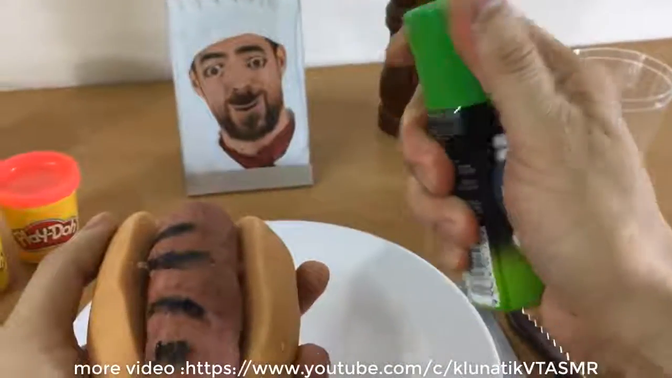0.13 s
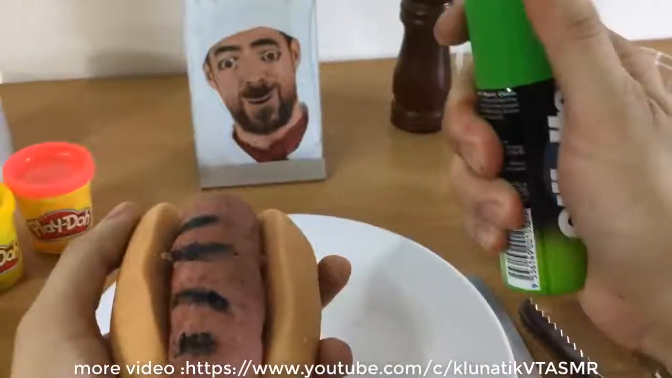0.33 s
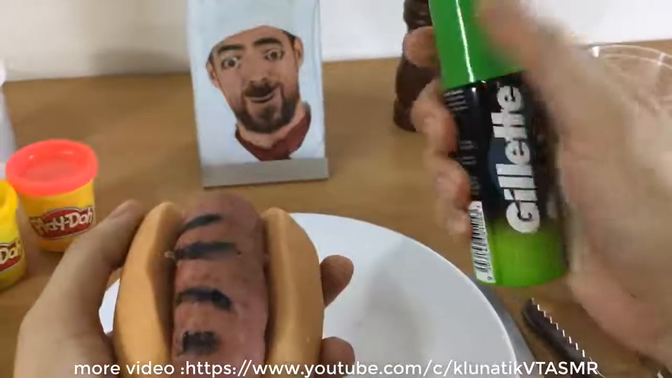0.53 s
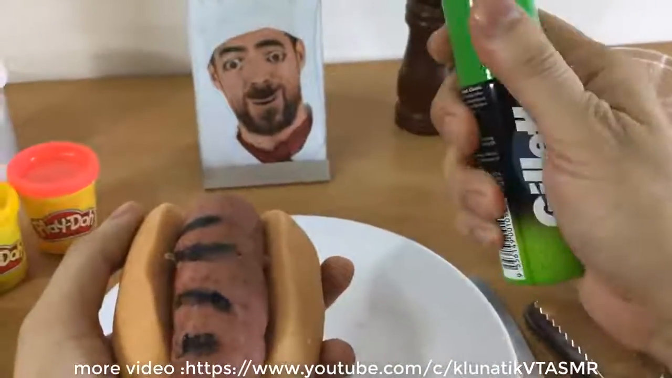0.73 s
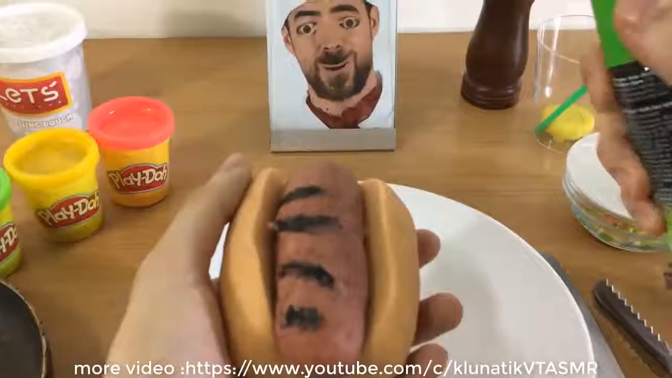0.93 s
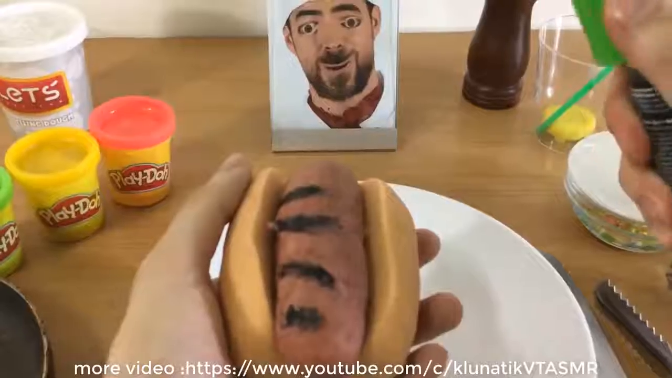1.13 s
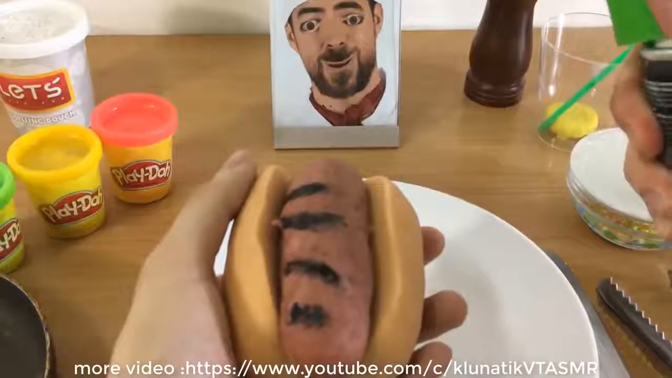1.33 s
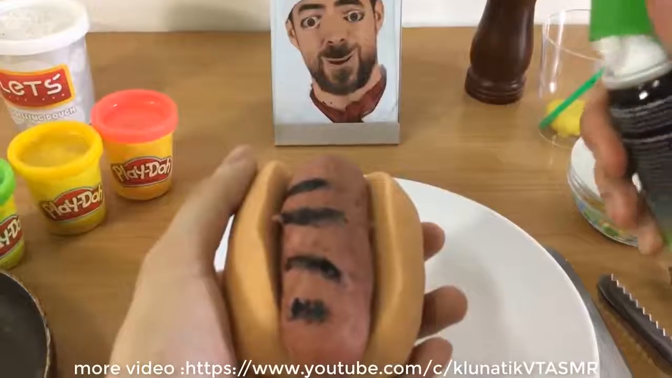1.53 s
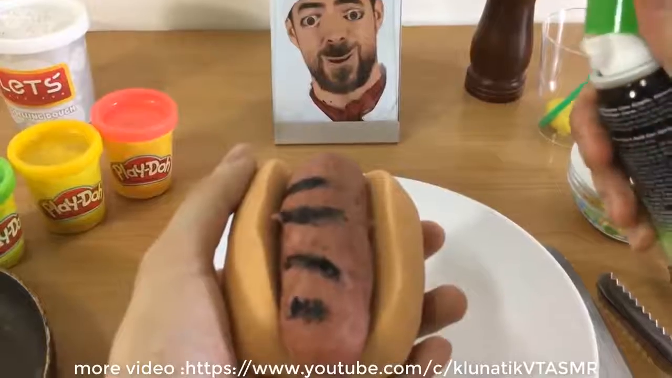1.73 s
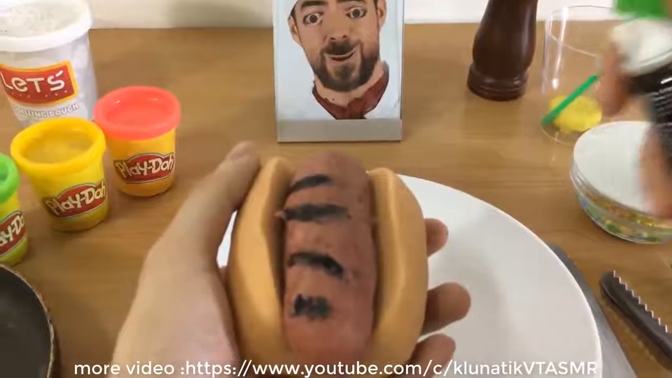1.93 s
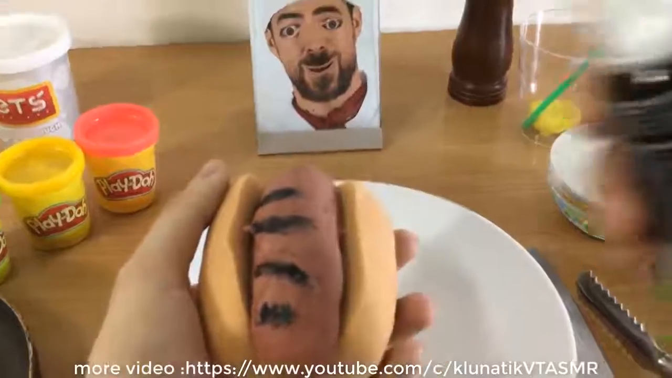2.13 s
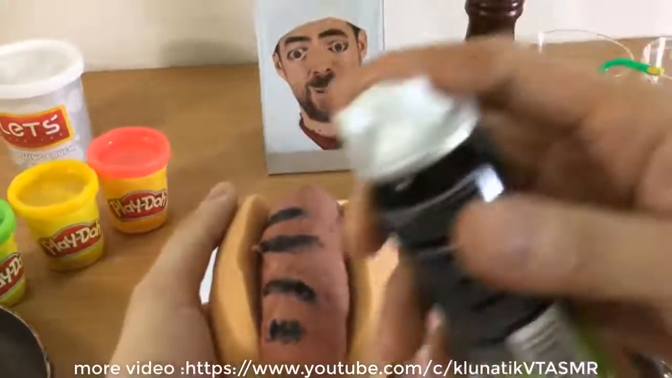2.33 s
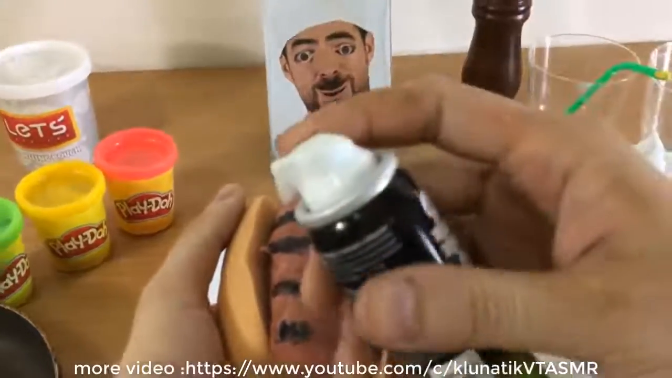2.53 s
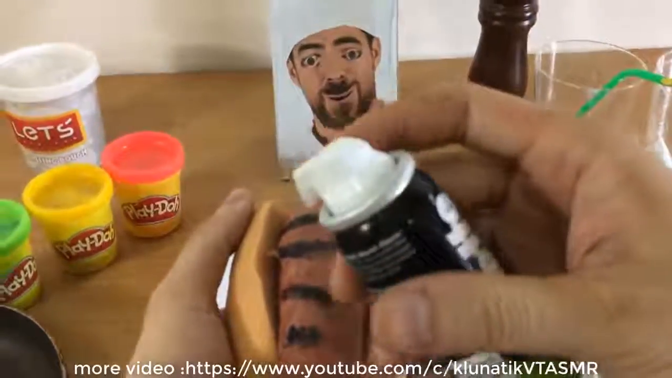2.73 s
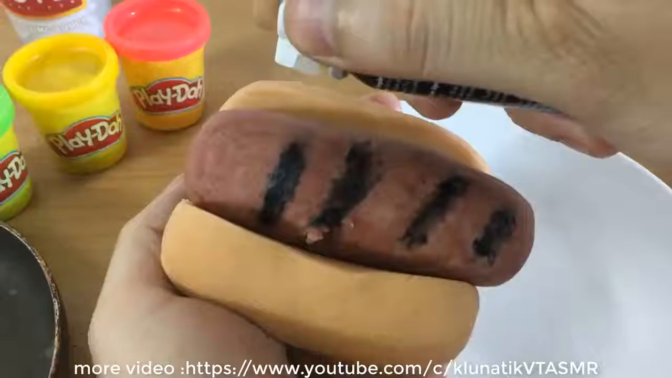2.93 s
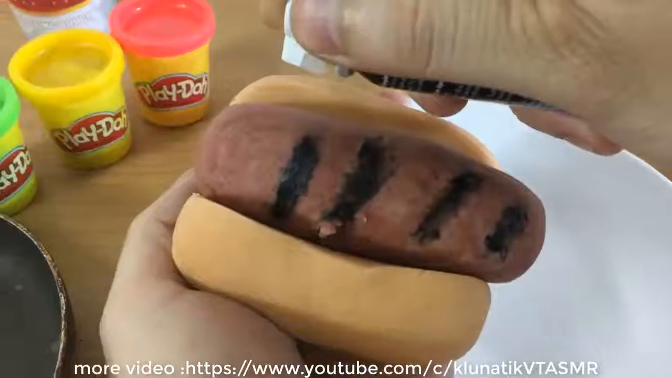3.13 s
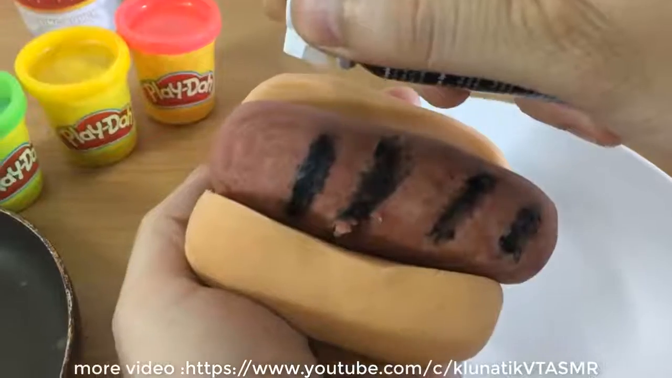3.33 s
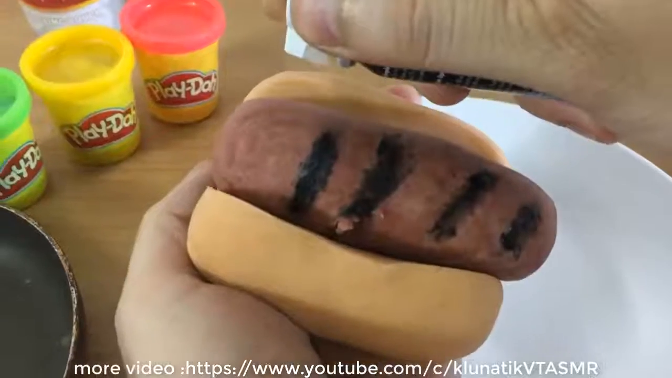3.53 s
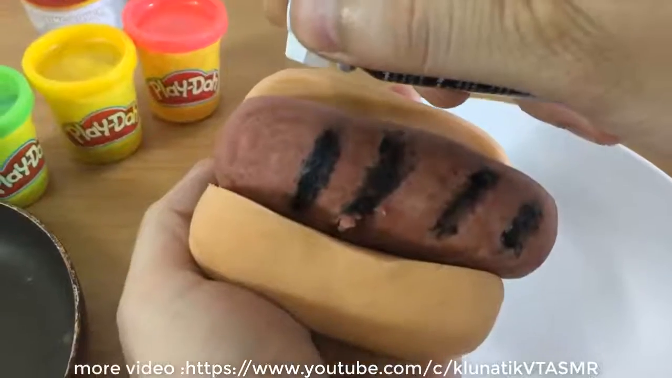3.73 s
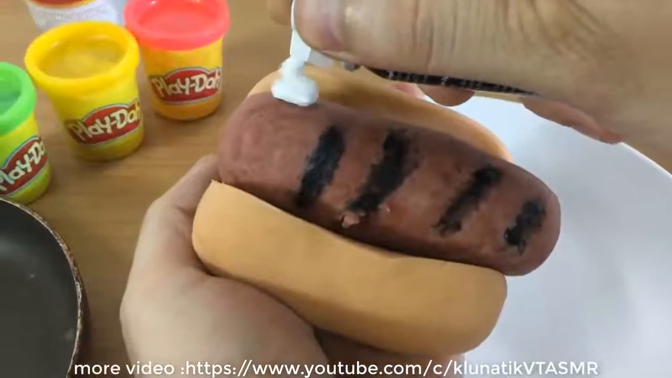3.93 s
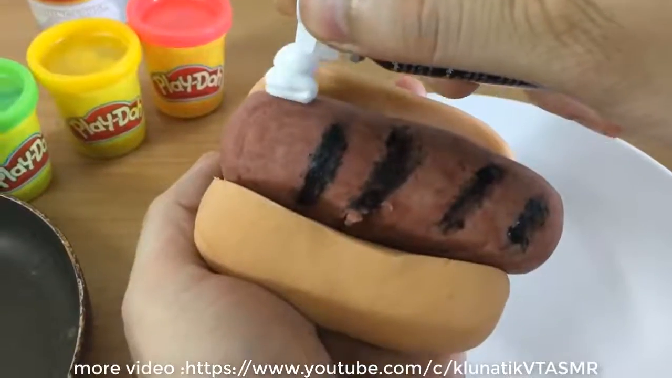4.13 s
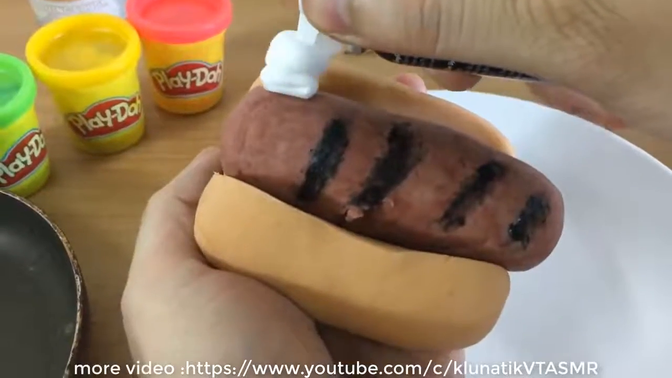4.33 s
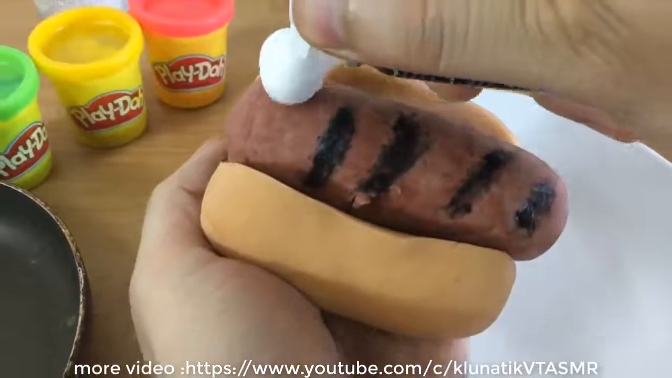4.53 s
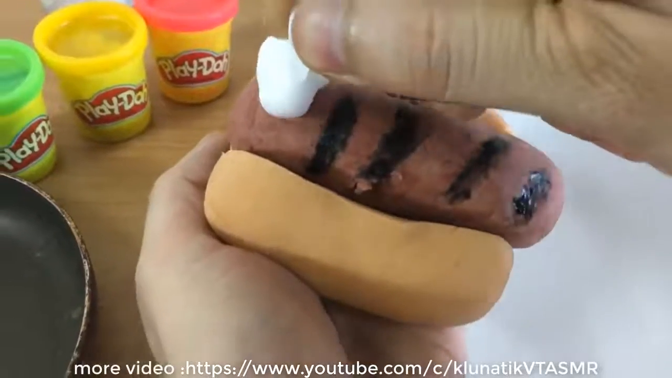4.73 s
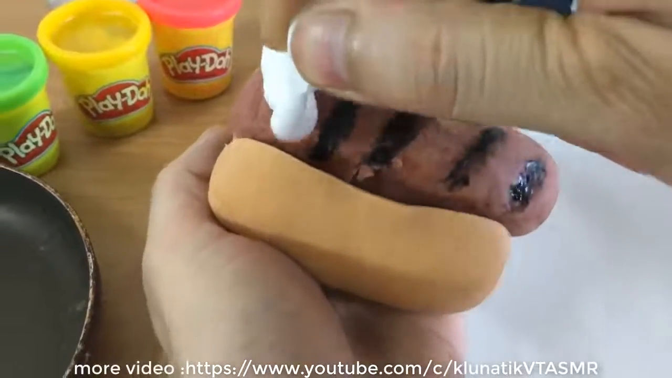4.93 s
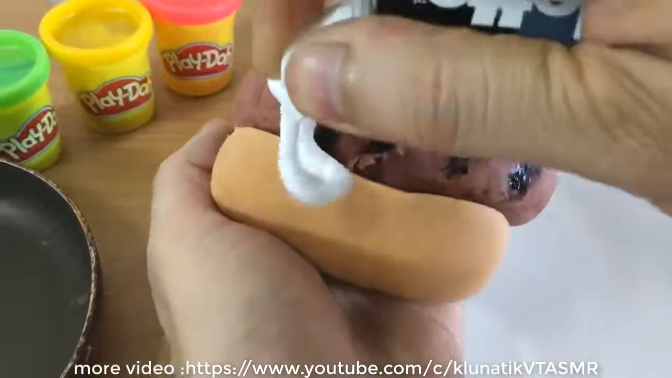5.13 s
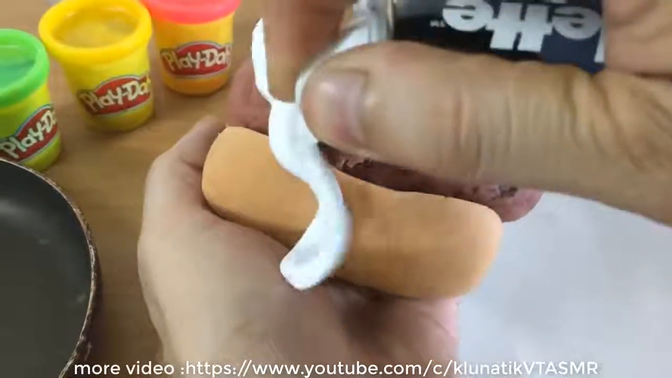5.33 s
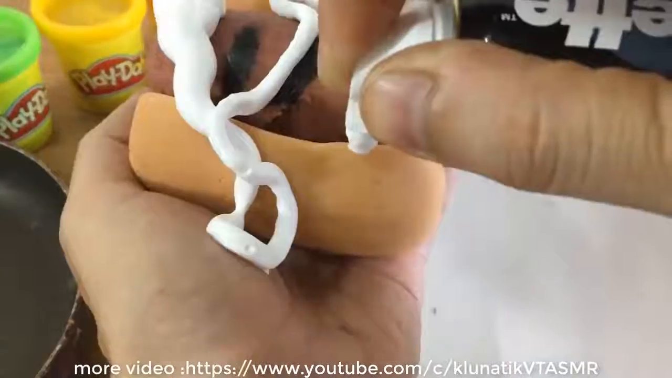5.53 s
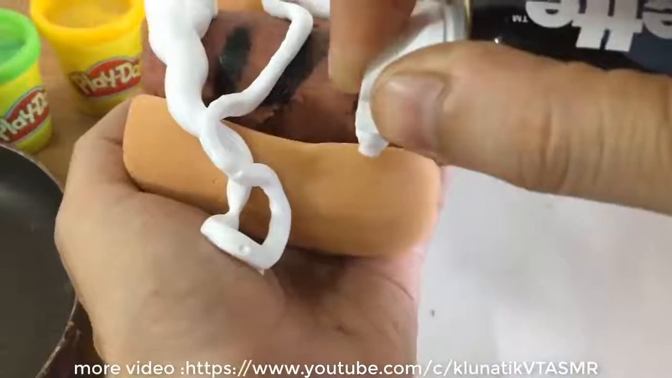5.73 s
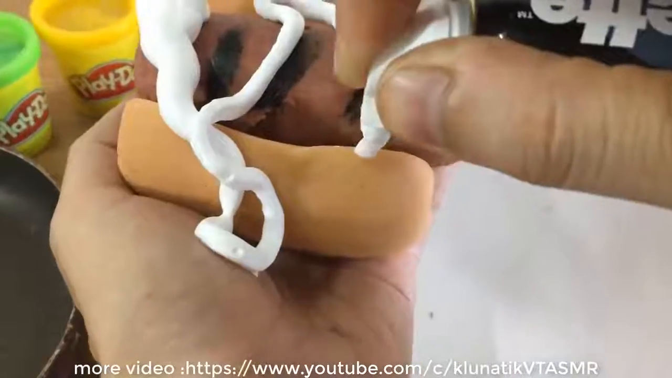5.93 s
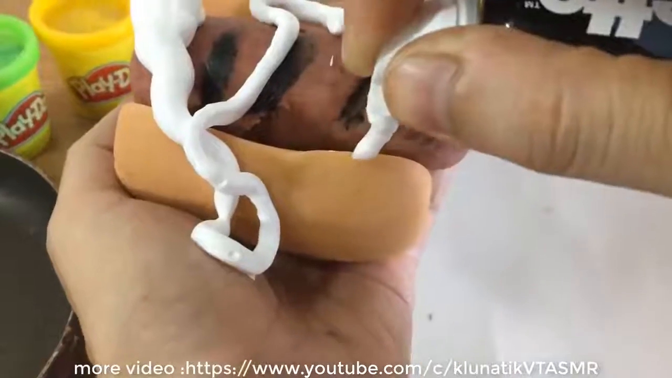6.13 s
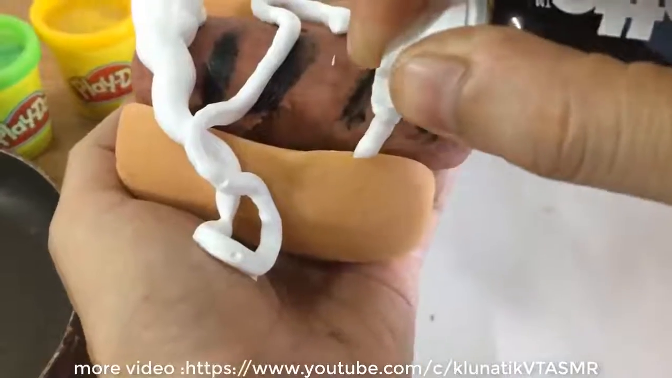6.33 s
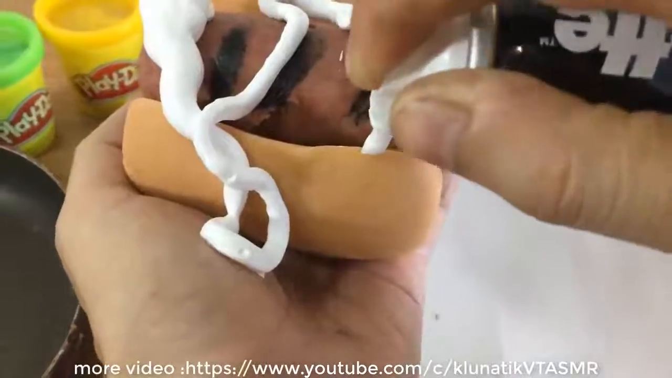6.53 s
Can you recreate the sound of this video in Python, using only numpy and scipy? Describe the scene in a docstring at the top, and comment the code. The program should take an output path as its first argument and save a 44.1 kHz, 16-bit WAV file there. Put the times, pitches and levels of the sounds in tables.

```python
"""A small room, where a can of shaving foam stands on a table close to a microphone.
Fingers rub and tap the can and snap off its cap: noise bursts, filtered clicks and decaying modes.
The valve opens with a swelling gas hiss over a faint fizz, both shaped noise. Then the foam takes over:
short noise spits, a brighter surge, and a wet sputter of ticks and ringing bubbles.
The room answers every close sound with a noise tail, over a low drone and passing rumbles."""
import sys
import numpy as np
from scipy import signal
from scipy.fft import rfft, irfft, next_fast_len
from scipy.io import wavfile
from scipy.ndimage import map_coordinates

SR = 44100
rng = np.random.default_rng(int(sys.argv[2]) if len(sys.argv) > 2 else 0)


def wrap_up_sound(samples):
    """Save the sound to the file named by the first command line argument, as 16-bit audio."""
    columns = np.atleast_2d(samples).T
    # keep every value between -1 and 1, then stretch to whole-number steps
    tamed = np.clip(columns, -1, 1)
    steps = np.round(tamed * 32767).astype(np.int16)
    wavfile.write(sys.argv[1], SR, steps)


N = 290178  # samples
# Spray timeline (s): valve starts to open, is fully open, foam plugs it, flow surges, jet breaks.
OPEN_S, FULL_S, FOAM_S, SURGE_S, BREAK_S = 3.595, 3.955, 4.025, 5.132, 5.615

# Levels in tables are relative: filters, layer trims and panning follow.
# In swells, rise_s and fall_s are the times for each 20 dB of change.

# Resonances of the spout and the hollow of the hand: centre_hz, width_hz, level_db
SPOUT_PEAKS = [(1900, 320, 0), (2400, 310, 2.5), (2970, 140, 3.5), (3690, 51, 7.5), (4980, 680, 5.5),
               (6170, 340, 3.5), (6960, 240, 2.5), (8660, 560, 4.5), (9730, 430, 4)]


def spray():
    """All sounds of the jet pass the same resonances of spout and hand."""
    jet = hiss() + spurts() + gurgle() + spits() + wheeze() + pops() + sputter()
    return coloured(jet, [(1000, 0)], SPOUT_PEAKS)


# Spectrum of escaping gas: freq_hz, level_db (per Hz)
GAS_TONE = [(400, -14), (1050, -9), (1600, -4.5), (2500, -4.5), (3000, 1), (4200, -3), (5800, -8.5),
            (7500, -4), (11000, -7), (13500, -25), (16000, -27)]
# Spectrum of tearing foam: freq_hz, level_db (per Hz)
FOAM_TONE = [(300, -15), (650, -16), (950, 2), (1800, -7), (2600, -2), (4200, -5.5), (5200, -5), (7200, -3),
             (9900, -1), (13500, 4.5), (16000, -17.5)]
# Narrow resonances of the foam-filled nozzle, heard in fizz and spits: centre_hz, width_hz, level_db
NOZZLE_PEAKS = [(2450, 280, 2.5), (5200, 220, 5), (5930, 270, 4.5), (7130, 300, 4), (9800, 340, 4.5),
                (11360, 410, 3)]
# Broad sheen of the faster surge: centre_hz, width_hz, level_db
SHEEN_PEAKS = [(8000, 2400, 7.5)]


def hiss():
    """Turbulent gas is uneven noise; foam tearing at the nozzle is a finer fizz, brighter in the surge."""
    gas_noise = pair([(1000, 0.95), (8000, 0.13)], size=N)
    gas_noise = gas_noise * amp(1.6 * wobble(350) + 0.91 * wobble(45))
    gas = unit(coloured(gas_noise, GAS_TONE, [(4150, 400, 4.4)]))
    tearing = pair([(1000, 0.91), (6000, 0.027)], size=N)
    tearing = tearing * amp(1.2 * wobble(900) + 1.2 * wobble(40))
    fizz = unit(coloured(tearing, FOAM_TONE, NOZZLE_PEAKS))
    bright_fizz = unit(coloured(tearing, FOAM_TONE, NOZZLE_PEAKS + SHEEN_PEAKS))
    foam = foam_flow() * fizz + surge() * bright_fizz
    return gas_flow() * gas * pan(-4.5) + foam * pan(-1.4)


def gas_flow(level_db=-48.5, power=1.8, choke_db_per_s=334):
    """Gas grows as a power of the valve's opening, until foam plugs the nozzle."""
    opening = ramp(OPEN_S, FULL_S - OPEN_S)
    return opening ** power * amp(level_db - choke_db_per_s * since(FOAM_S))


def foam_flow(level_db=-57, rise_s=0.16, broken_loss_db=3):
    """A faint fizz starts with the valve, runs steadily and thins a little when the jet breaks."""
    return ramp(OPEN_S, rise_s) * amp(level_db - broken_loss_db * ramp(BREAK_S, 0.16))


def surge(level_db=-43, rise_s=0.59, collapse_db_per_s=1200):
    """The flow swells smoothly and collapses when the jet breaks."""
    rise = np.sin(np.pi / 2 * ramp(SURGE_S, rise_s)) ** 2
    return rise * amp(level_db - collapse_db_per_s * since(BREAK_S))


# Sputter and pops, spectrum of bursting pockets: freq_hz, level_db (per Hz)
BURST_TONE = [(150, -9.5), (550, -8.5), (850, 3), (1600, 1), (2400, 1), (3200, 3), (4200, -0.5), (5300, -2),
              (6100, -6), (7000, -4), (7800, -13.5), (11000, -27), (16000, -54)]


def sputter(per_second=340, spread_db=4.6, clump_db=3.3, rush=0.2, wet=0.9):
    """Countless gas pockets crackle in clumps over a rush of air, each ringing at its own pitch."""
    t = np.arange(SR // 150) / SR
    at = np.flatnonzero(rng.random(N) < per_second / SR * amp(clump_db * wobble(90)))
    sizes = amp(spread_db * np.minimum(rng.exponential(size=len(at)), 3))
    hz = np.clip(2100 * np.exp(0.526 * rng.standard_normal((len(at), 1))), 700, 6500)
    # the ring decays by 1/e in 1.7 cycles
    rings = sizes[:, None] * np.sin(2 * np.pi * hz * t) * np.exp(-hz * t / 1.7)
    places = at[:, None] + np.arange(len(t))
    bubbles = np.bincount(places.ravel(), rings.ravel(), N)[:N]
    ticks = coloured(np.bincount(at, sizes, N), BURST_TONE)
    pockets = unit(ticks) + wet * unit(bubbles)
    reflections = burst(scatter=0.13, t60=0.023, side_db=2.5)
    crackle = signal.fftconvolve(pockets[None], reflections, axes=1)[:, :N]
    jet = unit(coloured(pair([(1000, 0.57), (5000, 0.18)], size=N), BURST_TONE))
    jet = jet * amp(1.6 * wobble(70))
    # sputters ever harder, holds, then eases off
    strength = ramp(BREAK_S, 0.13) * swell(6.266, db=-43, rise=1.4, hold=0.25, fall=0.14)
    return strength * unit(unit(crackle) + rush * jet) * pan(-7.0)


# Single gas pockets bursting from the spout, some loud, some faint: start_s, level_db, pitch_hz
POPS = [(4.0405, -32.5, 1090), (4.048, -39, 2090), (4.06, -46, 1110), (5.121, -35, 1010),
        (5.126, -32, 2450), (5.6247, -28.5, 1900), (5.6725, -34.5, 2800), (5.7072, -31.5, 1810),
        (5.7752, -20.5, 1400), (5.8577, -21, 2050), (5.9182, -26.5, 1090), (5.9932, -31, 2400),
        (6.014, -26, 4940), (6.0194, -25.5, 1820), (6.04, -29.5, 2970), (6.047, -32, 4520),
        (6.071, -26.5, 1850), (6.094, -26.5, 1560), (6.117, -32, 1850), (6.1583, -27.5, 4400),
        (6.1628, -25, 820), (6.171, -22, 4400), (6.1786, -26, 5000), (6.2207, -17.5, 1850),
        (6.2232, -24, 3130), (6.2315, -25, 2970), (6.2385, -24, 895), (6.244, -20.5, 2900),
        (6.2485, -21.5, 1900), (6.2494, -28, 900), (6.27, -27.5, 1810), (6.282, -32, 1400),
        (6.3055, -28.5, 1900), (6.3133, -35, 1600), (6.3185, -33, 1500), (6.3583, -35, 3040),
        (6.383, -30, 1330), (6.3896, -26, 1510), (6.4139, -20, 3100), (6.4211, -23, 1830),
        (6.4318, -21.5, 1770), (6.4603, -28, 1330), (6.4682, -25.5, 1900), (6.472, -26.5, 1290),
        (6.498, -35, 3640), (6.5275, -23, 1100)]


def pops(scatter=0.32):
    """Single gas pockets burst at the spout: a sharp tick, a spatter and a few cycles of bubble ring."""
    out, t = np.zeros((2, N)), np.arange(SR // 50) / SR
    for s, db, hz in POPS:
        spatter = burst(scatter, t60=0.028, side_db=-5)
        # each pocket lifts its own burst around its ring pitch
        tick = coloured(spatter, BURST_TONE, [(hz, 1240, 7)])
        ring = np.sin(2 * np.pi * hz * t) * np.exp(-hz * t / 3)
        add(out, s, amp(db + 2.5) * tick)
        add(out, s, amp(db - 6.5) * ring)
    return out * pan(-2.9)


# Single bubbles spitting through the spout, some loud, some faint: start_s, level_db
SPITS = [(4.2885, -41.5), (4.4135, -36.5), (4.5363, -38), (4.588, -53), (4.678, -44), (4.6928, -41),
         (4.7125, -39), (4.7407, -39), (4.7699, -44), (4.803, -41.5), (4.8434, -38), (4.8736, -40),
         (4.8856, -41), (4.923, -42), (4.9735, -41), (4.997, -44), (5.009, -41), (5.0235, -38)]
# Spectrum of a spit: freq_hz, level_db (per Hz)
SPIT_TONE = [(2000, -9.5), (4400, -13.5), (5300, -4.5), (6600, -2.5), (8200, -8.5), (9900, -6),
             (12500, -7.5), (16000, -15)]


def spits(per_second=13, middle_s=4.8, spread_s=0.27, random_db=-44, spread_db=1.5):
    """Each bubble passes as a few milliseconds of high hiss; further random ones cluster mid-flow."""
    out, u = np.zeros((2, N)), np.arange(SR // 30) / SR / 0.0012
    rate = per_second * np.exp(-.5 * ((np.arange(N) / SR - middle_s) / spread_s) ** 2)
    at = np.flatnonzero(rng.random(N) < rate / SR)
    random_spits = zip(at / SR, random_db + spread_db * rng.standard_normal(len(at)))
    for s, db in [*SPITS, *random_spits]:
        add(out, s, amp(db) * u * np.exp(1 - u))  # envelope peaks after 1.2 ms
    hiss_bits = coloured(out * pair([(1000, 0.126)], size=N), SPIT_TONE, NOZZLE_PEAKS)
    return amp(-2.5) * hiss_bits * pan(-4.0)


# Spurts of gas around the arrival of the foam: start_s, level_db
SPURTS = [(3.997, -39), (4.001, -52), (4.009, -51), (4.012, -41), (4.0235, -52), (4.03, -38.5)]
# Spectrum of a spurt: freq_hz, level_db (per Hz)
SPURT_TONE = [(500, -13), (1500, -3), (2600, -1), (4300, 3), (6000, -1), (8000, -6), (11000, -3),
              (13500, -12), (16000, -25)]


def spurts():
    """The first plugs of foam chop the gas into short, bright spurts of noise."""
    out, u = np.zeros((2, N)), np.arange(SR // 30) / SR / 0.0014
    for s, db in SPURTS:
        add(out, s, amp(db) * u * np.exp(1 - u))  # envelope peaks after 1.4 ms
    return amp(1.5) * coloured(out * pair([(1000, 0.17)], size=N), SPURT_TONE) * pan(-6.5)


# Foam piling up at the spout: full_s, level_db, rise_s, hold_s, fall_s
GURGLES = [(3.888, -61, 0.23, 0.018, 0.079), (4.03, -51.5, 0.052, 0.01, 0.14),
           (4.395, -57, 0.071, 0.013, 0.036), (5.52, -51, 0.13, 0.08, 0.023)]
# Spectrum of a gurgle: freq_hz, level_db (per Hz)
GURGLE_TONE = [(400, -39), (700, -13), (850, 4), (1200, 0), (1500, -10), (2500, -25), (8000, -52)]


def gurgle():
    """Thick foam flutters in the spout: a narrow low-mid noise of restless level."""
    flutter = pair([(1000, 0.99)], size=N) * amp(3.6 * wobble(90))
    flutter = unit(coloured(flutter, GURGLE_TONE))
    return sum(swell(*row) for row in GURGLES) * flutter * pan(-1.5)


# Wheezes just after the jet breaks: full_s, level_db, rise_s, hold_s, fall_s
WHEEZES = [(5.648, -44, 0.033, 0.021, 0.02), (5.738, -45, 0.029, 0.011, 0.024)]
# Spectrum of a wheeze: freq_hz, level_db (per Hz)
WHEEZE_TONE = [(1000, -19), (4000, -5.5), (5500, -6), (6500, 1), (7300, -5.5), (8000, -21), (16000, -30)]


def wheeze():
    """The broken jet wheezes through the half-empty spout as rough, high noise."""
    air = pair([(1000, 0.3)], size=N) * amp(2.5 * wobble(300))
    air = unit(coloured(air, WHEEZE_TONE))
    return sum(swell(*row) for row in WHEEZES) * air * pan(-2.5)


# The spray button clicking under the thumb: start_s, level_db, pitch_hz, ring_db
BUTTON = [(4.7613, -27, 1900, 17), (4.906, -30.5, 900, 7), (4.9123, -17, 600, 4)]
# Spectrum of the button click: freq_hz, level_db (per Hz)
BUTTON_TONE = [(150, -3), (450, -5.5), (800, 0.5), (1100, 2.5), (1500, -4.5), (2100, 1.5), (2700, -5.5),
               (4500, -7.5), (6000, -14), (8000, -23), (16000, -36)]


def button():
    """The plastic button gives way with a dull, solid click that the room answers."""
    near, bare = np.zeros((2, 2, N))
    for s, db, hz, ring_db in BUTTON:
        click = coloured(burst(scatter=0.11, t60=0.031), BUTTON_TONE, [(hz, 800, ring_db)])
        add(near, s, amp(db + 9.0) * click)
        add(bare, s, amp(db + 8.5) * np.ones(1))
    return near * pan(-3.0) + amp(-6) * room(coloured(bare, BUTTON_TONE))


# Bright click of the rim: freq_hz, level_db
RIM_TONE = [(300, -17), (1000, 9.5), (1800, -24.5), (2500, -6), (3800, -2.5), (5700, 1.5), (7700, 2),
            (11000, -5.5), (17000, -2)]
# Crack of the plastic: freq_hz, level_db
CRACK_TONE = [(300, -6), (1200, -12), (2050, -2), (3000, 3.5), (4000, 1), (6000, 0), (7500, -6), (9000, -9),
              (14000, -5), (17000, -15)]


def plastic(x, rim_db, crack_db):
    """Thin plastic colours a scrape or click with its bright rim and its crack."""
    return amp(rim_db) * coloured(x, RIM_TONE) + amp(crack_db) * coloured(x, CRACK_TONE)


# The cap slips over the rim, then pops off: start_s, knock_db, hollow_hz, hollow_db, wall_ring_db,
# rim_click_db, crack_db, room_db, left_right_db, left_phase_lag_cycles
CAP_SNAPS = [(1.2418, -0.5, 408, 12, 7.5, -8, -12.5, -8, -1.5, 0.019),
             (1.3918, 14, 440.5, 10.5, -0.5, -3.5, 9, -5, -4.5, 0.22)]
# Dull body of the knock: freq_hz, level_db
KNOCK_TONE = [(100, -9.5), (200, -4.5), (300, -2), (400, 2.5), (600, 0), (750, 2), (860, -4), (1000, 3.5),
              (1400, -1.5), (1800, -3.5), (2200, -9.5), (3500, -42), (16000, -52)]
# The knock coming back from table top and walls: delay_s, level_db
ECHOES = [(0.004, -14.5), (0.019, -18.5), (0.053, -17.5), (0.137, -28)]
# Resonances of table and room woken by the cap: pitch_hz, level_db, t60_s
TABLE_MODES = [(201.7, -19.5, 0.87), (222.2, -17.5, 0.99), (259.4, -16, 0.69), (270, -18, 0.78),
               (341, -17.5, 0.4), (364, -21.5, 0.51), (417, -15, 0.13), (489, -11.5, 0.5), (605, -20, 0.77),
               (690, -22, 0.33), (775, -22.5, 0.39), (938, -31, 0.28), (1020, -19, 0.75), (1190, -26, 0.48)]


def cap():
    """The rim scrapes, then lets go with a crack and a broad, hollow knock; table and room answer."""
    out, snap = np.zeros((2, 2, N))
    t = np.arange(SR) / SR
    step = 1. * (t == 0)
    for s, knock_db, hz, hollow_db, wall_db, rim_db, crack_db, room_db, side_db, lag in CAP_SNAPS:
        peaks = [(hz, 230, hollow_db), (1800, 650, wall_db)]
        knock = amp(knock_db) * coloured(step, KNOCK_TONE, peaks)
        near = np.zeros((1, N))
        add(near, s, knock)
        # a constant phase turn makes the left channel lag
        turn = np.exp(-2j * np.pi * np.array([[lag], [0]]))
        out += np.real(signal.hilbert(near, next_fast_len(N))[:, :N] * turn) * pan(side_db)
        scrape = plastic(rasp(alike=0.527, t60=0.0069), rim_db, crack_db)
        add(out, s - .0013, amp(-8.5) * scrape)
        release = plastic(rasp(alike=0.65, t60=0.023), rim_db, crack_db)
        add(out, s + .0004, amp(-1.5) * release * pan(side_db - 2))
        for delay, echo_db in ECHOES:
            add(out, s + delay, amp(echo_db) * knock)
        table = ringing(TABLE_MODES, apart=0.079) * (1 - np.exp(-t / 0.0027))
        add(out, s, amp(knock_db + room_db - 24.5) * table)
        add(snap, s, amp(room_db) * knock + plastic(step, rim_db - 9.5, crack_db - 6.5))
    return out + room(snap) * amp(0.96 * wobble(90)) * pan(-0.68)


# The freed cap scraping against the fingers: start_s, level_db
CAP_SCRAPES = [(1.875, -56), (1.89, -50.5), (1.904, -47.5)]
# Spectrum of that scrape: freq_hz, level_db (per Hz)
CAP_SCRAPE_TONE = [(400, -12), (1000, -4.5), (1400, -6.5), (1700, 6), (2000, -13), (2350, 1.5), (2750, -8),
                   (3500, -22), (8000, -23), (16000, -28.5)]
# Modes of the freed cap: pitch_hz, level_db, t60_s
LOOSE_CAP_MODES = [(1660, 2, 0.13), (2360, -2, 0.08), (2560, -6, 0.08)]


def loose_cap():
    """The freed cap scrapes softly as it is put aside, and its wall rings."""
    out = np.zeros((2, N))
    for s, db in CAP_SCRAPES:
        add(out, s, amp(db - 4) * ringing(LOOSE_CAP_MODES, apart=0.1))
        add(out, s, amp(db + 26.5) * coloured(rasp(alike=0.56, t60=0.033), CAP_SCRAPE_TONE))
    return out + amp(-7) * room(out)


# Taps on the can: start_s, level_db, ring_db (against the tick), tick_hz
TAPS = [(0.247, -45, -31, 4100), (0.26, -44, 0.5, 2900), (0.271, -42, -25, 4050), (0.349, -43, -17, 6440),
        (0.389, -46, -25, 4100), (0.411, -38, 6.5, 2480), (0.88, -36.5, -29, 8400),
        (1.212, -38.5, -16, 8000), (1.877, -43, -19.5, 6870), (2.145, -41.5, -7.5, 3810)]
# Thin metal shell of the can: freq_hz, level_db
CAN_TONE = [(300, -4), (1000, -4.5), (1600, -18), (2200, -15.5), (2400, -3.5), (2650, -5), (2960, 1.5),
            (3100, -10), (3280, -10.5), (3600, -20.5), (4100, -16), (5000, -21.5), (8000, -40),
            (16000, -43)]
# Strokes of the fingers over can and cap: fastest_s, level_db, rise_s, fall_s
STROKES = [(0.77, -69.5, 0.16, 0.07), (1.06, -71.5, 0.42, 0.37), (1.13, -59, 0.051, 0.039),
           (1.885, -68, 0.055, 0.061), (2.168, -66, 0.04, 0.018)]
# Spectrum of skin rubbing: freq_hz, level_db (per Hz)
RUB_TONE = [(500, -7), (1700, -12), (4000, 0), (6000, -7), (9000, -8), (13000, -9), (16000, -17)]


def handling():
    """Fingers slide over the can and tap it; its shell answers with a short, rough ring."""
    out, t = np.zeros((2, N)), np.arange(SR // 2) / SR
    dying = amp(-60 * t / 0.023)
    for s, db, ring_db, hz in TAPS:
        tick = coloured(pair([(1000, 0.17)], size=len(t)) * dying, RUB_TONE, [(hz, 450, 9)])
        rough_tail = amp(-18 - 60 * t / 0.33 + 3 * wobble(110)[:len(t)])
        shell = coloured(pair([(1000, 0.499)], size=len(t)), CAN_TONE) * (dying + rough_tail)
        add(out, s, amp(db) * (amp(-8.5) * tick + amp(ring_db + 2.5) * shell))
    rub = pair([(1000, 0.27)], size=N) * amp(2.2 * wobble(119.7))
    slide = unit(coloured(rub, RUB_TONE))
    speed = sum(swell(s, db, rise, 0, fall) for s, db, rise, fall in STROKES)
    out += amp(7.0) * speed * slide
    return out * pan(-4.0) + amp(-9.5) * room(out)


# Left-right likeness of the room's sound, in tail and drone: freq_hz, likeness (0 to 1)
ROOM_ALIKE = [(60, 0), (150, 0.37), (380, 0.47), (950, 0.69), (2400, 0.62), (6000, 0.14), (15000, 0.44)]
# Reverb time of the room: freq_hz, t60_s
ROOM_DECAY = [(150, 0.78), (400, 0.63), (1500, 0.95), (5000, 0.65), (11000, 0.53), (16000, 0.292)]
# Colour of the reverb: freq_hz, level_db
ROOM_COLOUR = [(60, -4), (150, 8), (280, -1.5), (500, -4), (1000, -2.5), (3000, -0.5), (6000, -0.5),
               (14000, -2.5)]


def room(x):
    """The room's answer is a noise tail that builds up quickly and fades at its own rate in each band."""
    hz, t, z = signal.stft(pair(ROOM_ALIKE, size=SR), SR, nperseg=256)
    decay_db = 60 * t / along(ROOM_DECAY, hz)[:, None]
    fade = amp(along(ROOM_COLOUR, hz)[:, None] - decay_db)
    tail = signal.istft(z * fade * (1 - np.exp(-t / 0.0015)), SR, nperseg=256)[1]
    tail = tail / np.linalg.norm(tail[0])
    return signal.fftconvolve(x.mean(0)[None], tail, axes=1)[:, :N]


# Spectrum of the steady drone: freq_hz, level_db (per Hz)
ROOM_TONE = [(15, -27), (25, -2), (48, 4.5), (76, -4), (173, -6.5), (202, -1.5), (231, -9), (353, -13),
             (436, -17), (472, -15.5), (666, -19), (1260, -24), (2310, -35), (14000, -47.5)]
# Low rumbles that come and go: full_s, level_db, rise_s, hold_s, fall_s, centre_hz
RUMBLES = [(2.762, -43, 0.076, 0.054, 0.046, 210), (2.971, -47.5, 0.15, 0.046, 0.29, 54),
           (3.65, -51.5, 0.57, 0.57, 0.4, 135), (4.102, -45.5, 0.43, 0.62, 0.47, 45)]
# Spectrum under each rumble's peak: freq_hz, level_db (per Hz)
RUMBLE_TONE = [(15, -17.5), (35, -1), (50, -4), (80, -8), (135, -0.5), (200, -1.5), (400, -38),
               (1500, -80.5)]


def room_tone():
    """Low noise makes the room's steady drone; narrow bands of noise rumble under it."""
    steady = amp(-45.0) * unit(coloured(pair(ROOM_ALIKE, size=N), ROOM_TONE))
    rumble = np.zeros((2, N))
    for *shape, hz in RUMBLES:
        noise = coloured(pair([(60, 0.36)], size=N), RUMBLE_TONE, [(hz, 35, 16)])
        rumble += swell(*shape) * unit(noise)
    return steady * pan(0.27) + rumble * pan(3.6)


def amp(db):
    """Decibels to linear gain."""
    return 10 ** (np.asarray(db) / 20)


def unit(x):
    """Scale to an RMS of one."""
    return x / np.sqrt(np.mean(x ** 2) + 1e-20)


def along(points, hz):
    """Read a curve of (Hz, value) points on a log frequency axis."""
    f, v = np.transpose(points)
    return np.interp(np.log(hz + 1), np.log(f + 1), v)


def wobble(rate):
    """A smooth random curve, rate knots a second."""
    knots = rng.standard_normal(int(N * rate / SR) + 4)
    return map_coordinates(knots, [np.arange(N) * rate / SR])


def pan(db):
    """Left and right gains, db apart; positive leans left."""
    return amp([[db / 2], [-db / 2]])


def add(track, s, sound):
    """Mix a sound into a track at time s."""
    part = track[:, max(round(s * SR), 0):][:, :sound.shape[-1]]
    part += sound[..., :part.shape[1]]


def coloured(x, tone, peaks=()):
    """A causal minimum-phase filter of unit energy with the given spectrum and resonance peaks."""
    n = x.shape[-1]
    m = 2 * next_fast_len(n // 2 + 2048)
    hz = np.fft.rfftfreq(m, 1 / SR)
    level_db = along(tone, hz)
    for f, width, db in peaks:
        level_db = level_db + db / (1 + (2 * (hz - f) / width) ** 2)
    # folding the cepstrum onto positive times makes the filter causal
    cepstrum = irfft(np.log(unit(amp(level_db)))) * (1 + np.sign(m // 2 - np.arange(m)))
    cepstrum[0] /= 2
    return irfft(rfft(x, m) * np.exp(rfft(cepstrum)), m)[..., :n]


def pair(alike, size):
    """White stereo noise with a left-right likeness for each frequency."""
    turn = np.arccos(np.clip(along(alike, np.fft.rfftfreq(size, 1 / SR)), -1, 1)) / 2
    spectra = rfft(rng.standard_normal((2, size)))
    mid, side = irfft(spectra * [np.cos(turn), np.sin(turn)], size)
    return np.array([mid + side, mid - side])


def burst(scatter, t60, side_db=0):
    """One sharp click, panned by side_db, then quick noisy reflections between hands, can and table."""
    t = np.arange(SR // 30) / SR
    reflections = scatter * rng.standard_normal((2, len(t))) * amp(-60 * t / t60)
    return (t == 0) * pan(side_db) + reflections


def rasp(alike, t60):
    """A burst of stereo noise of unit energy per channel on average, down 60 dB after t60 seconds."""
    t = np.arange(SR) / SR
    noise = pair([(1000, alike)], size=len(t)) * amp(-60 * t / t60)
    return unit(noise) / np.sqrt(len(t))


def ringing(modes, apart):
    """Decaying modes whose phases lie a little apart (cycles) at the two microphone ports."""
    t = np.arange(SR) / SR
    out = np.zeros((2, SR))
    for f, db, t60 in modes:
        phase = rng.random() + apart * rng.standard_normal((2, 1))
        out += amp(db - 60 * t / t60) * np.sin(2 * np.pi * (f * t + phase))
    return out


def since(s):
    """Seconds gone by since time s, zero before it."""
    return np.maximum(np.arange(N) / SR - s, 0)


def ramp(s, length):
    """A straight rise from 0 at time s to 1 after length seconds."""
    return np.minimum(since(s) / length, 1)


def swell(s, db, rise, hold, fall):
    """Gain that is full at time s and holds; it moves by 20 dB in each rise or fall time."""
    early = np.maximum(s - np.arange(N) / SR, 0)
    return amp(db - 20 * (early / rise + since(s + hold) / fall))


def scene():
    """The spray and the hands close by, the room behind them."""
    jet = spray()
    # the spray reaches the left port two samples before the right one
    direct = np.array([jet[0], np.roll(jet[1], 2)])
    hands = handling() + cap() + loose_cap() + button()
    return direct + hands + amp(-7.5) * room(jet) + room_tone()


# Frequency response of the microphone: freq_hz, level_db
MICROPHONE = [(12, -19), (28, -7.5), (42, 1), (11000, -1), (14000, -8.5), (15800, -20)]


def record(dry, top_hz=15800):
    """The microphone rounds off high peaks, loses the deepest bass and keeps nothing above top_hz."""
    limited = dry / (1 + (dry / .9) ** 6) ** (1 / 6)
    m = next_fast_len(N + SR // 2)
    hz = np.fft.rfftfreq(m, 1 / SR)
    response = amp(along(MICROPHONE, hz)) * (hz < top_hz)
    return irfft(rfft(limited, m) * response, m)[:, :N]


dry = scene()
out = record(dry)
wrap_up_sound(out)
```